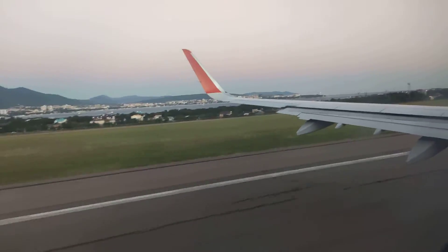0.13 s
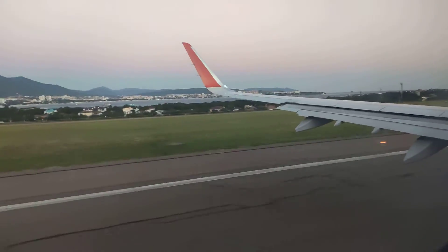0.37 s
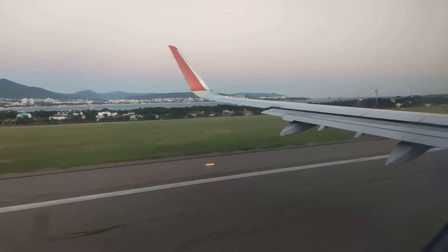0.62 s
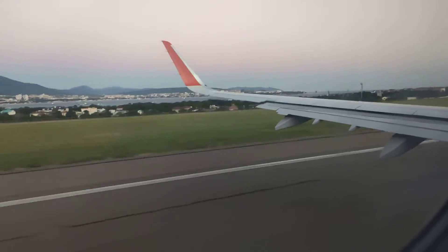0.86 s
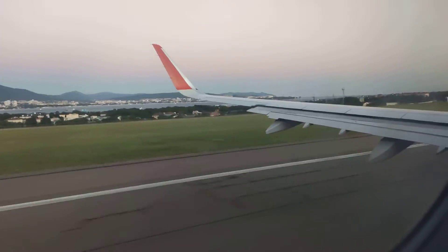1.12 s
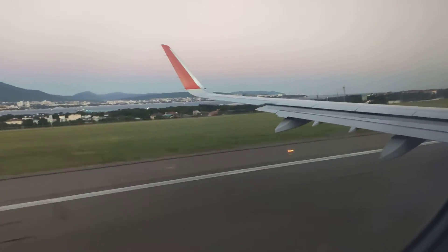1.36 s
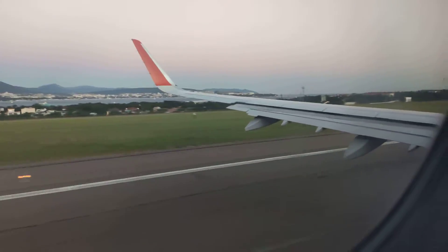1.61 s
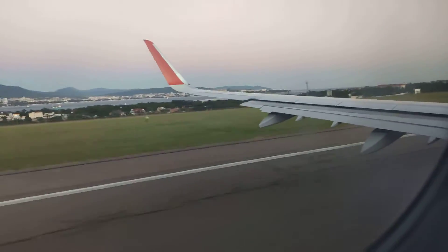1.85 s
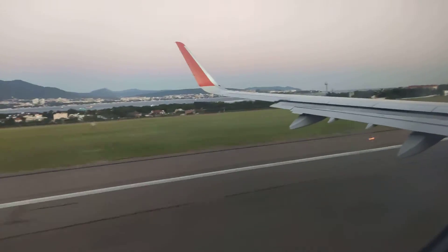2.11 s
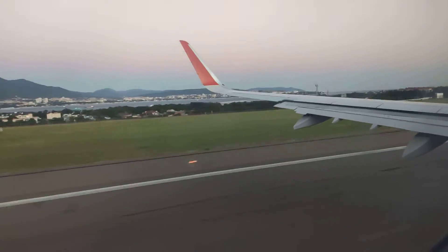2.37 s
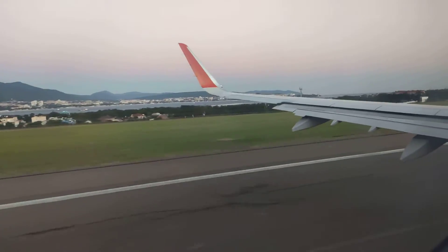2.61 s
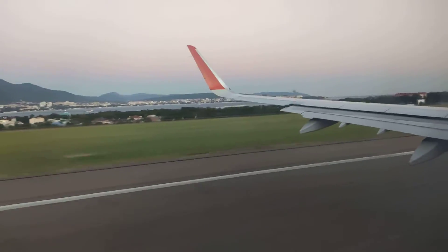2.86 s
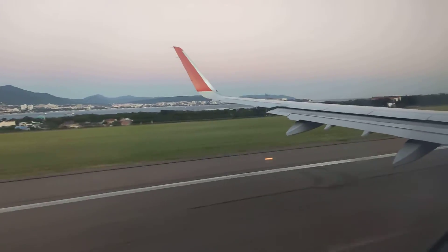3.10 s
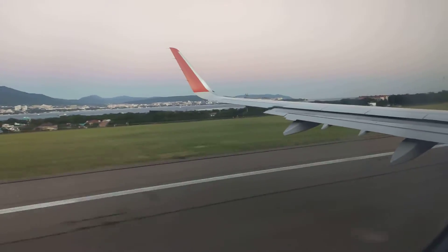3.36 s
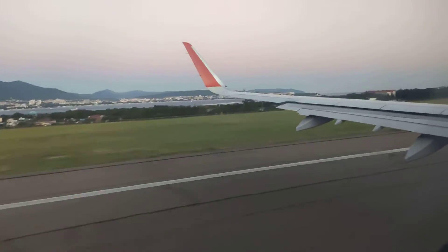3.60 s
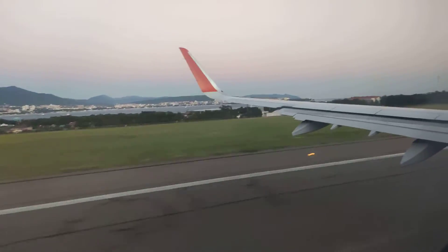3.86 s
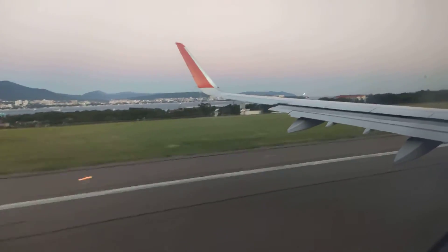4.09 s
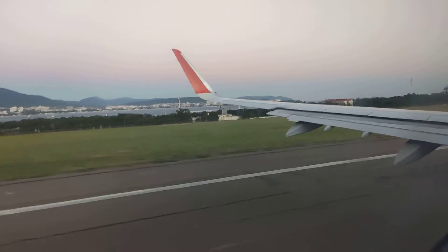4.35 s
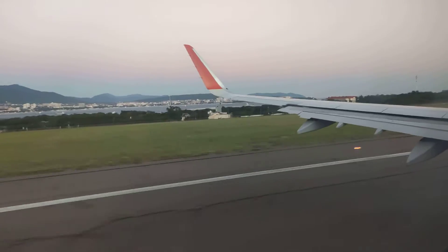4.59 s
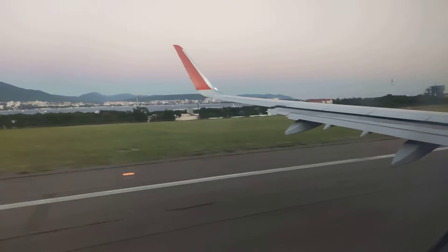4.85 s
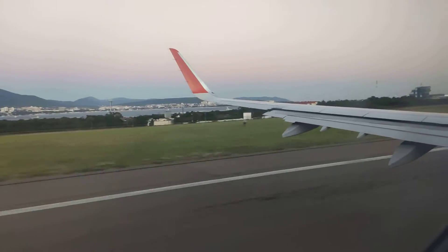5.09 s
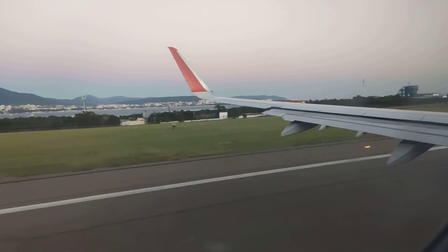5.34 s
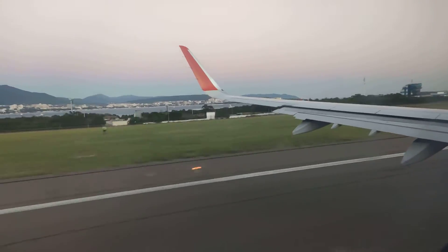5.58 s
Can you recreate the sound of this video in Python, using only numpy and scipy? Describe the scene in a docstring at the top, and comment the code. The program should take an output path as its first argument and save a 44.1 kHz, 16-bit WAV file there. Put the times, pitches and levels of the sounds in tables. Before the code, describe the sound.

For about 5.7 seconds we sit by the window of an airliner speeding down the runway. A loud, deep, boomy roar of engines and rolling dominates from the start, thickest in the low range around 150 to 300 Hz, swelling very slightly in the first half second and then holding steady. Beneath it the floor and landing gear drum with a soft, unsteady thud, a little weaker after 4 seconds. A faint airy hiss flutters on top. Runway bumps, several per second, make distant panels rattle in short grainy swells, notable near 1.5, 2.0 and 3.6 seconds and strongest at 3.9. Loose plastic trim gives small, dry, bright ticks, often left of centre: a pair at 2.0, one at 3.1, a sharp cluster at 3.9, and a busy run from 5.1 to the end. The lining answers very briefly. The small stereo microphone gives wide treble, nearly central bass and limited peaks.

```python
"""Jet and runway roar booms through the fuselage of an airliner on its take-off roll, heard in the cabin.
The roar is noise shaped by hull modes; a low thud is noise shaped by floor and gear modes.
Filtered noise hisses along skin and vents; loose plastic trim, mostly on the left, ticks in short bursts.
Panels farther off rattle in many small contacts that follow the runway bumps, and the lining answers.
A small stereo microphone with a peak limiter listens by the window."""
import sys
import numpy as np
from scipy import signal
from scipy.fft import rfft, irfft, next_fast_len
from scipy.io import wavfile
from scipy.ndimage import uniform_filter1d, minimum_filter1d, map_coordinates

SR = 44100
rng = np.random.default_rng(int(sys.argv[2]) if len(sys.argv) > 2 else 0)


def generate_wav(signal):
    """Clip the signal to [-1, 1] and save it as 16-bit WAV at the path in sys.argv[1]."""
    frames = np.transpose(np.atleast_2d(signal))
    scaled = np.clip(frames, -1, 1) * 32767
    pcm = np.round(scaled).astype(np.int16)
    wavfile.write(sys.argv[1], SR, pcm)


def gain_from_decibels(decibels):
    """Convert decibel values to linear amplitude factors."""
    exponent = np.asarray(decibels, float) / 20
    return 10 ** exponent


N = 251811


def unit_rms(x):
    """Scales to rms 1 over both channels together."""
    return x / np.sqrt(np.mean(x ** 2) + 1e-20)


def along(points, hz):
    """Reads (Hz, value) points along a log frequency axis."""
    point_hz, value = np.transpose(points)
    return np.interp(np.log(hz + 1), np.log(point_hz + 1), value)


def curves(rows):
    """Draws one value per sample for each column after the time."""
    s, *columns = np.transpose(rows)
    return [np.interp(np.arange(N) / SR, s, column) for column in columns]


def wobble(rate):
    """A smooth random curve with rate knots a second."""
    knots = rng.standard_normal(int(N * rate / SR) + 4)
    return map_coordinates(knots, [np.arange(N) * rate / SR])


def filtered(x, response):
    """Applies a response of frequency; mirrored ends keep the edges steady."""
    edge = 4096
    x = np.pad(x, [(0, 0), (edge, edge)], "reflect")
    size = next_fast_len(x.shape[1])
    spectrum = rfft(x, size) * response(np.fft.rfftfreq(size, 1 / SR))
    return irfft(spectrum, size)[:, edge:edge + N]


def modes(table, hz):
    """Gain of resonances driven by unrelated noise, so that their powers add."""
    power = 0
    for centre, width, db in table:
        detune = (hz * hz - centre * centre) / (hz * width + 1e-9)
        power = power + gain_from_decibels(db) ** 2 / (1 + detune ** 2) ** 2
    return np.sqrt(power)


# Likeness of the sound at the two microphone ports.
# Each row: frequency in Hz, left-right correlation from -1 to 1.
PORT_LIKENESS = [(40, .998), (90, .994), (190, .975), (330, .91), (600, .7), (900, .2), (1300, -.07),
                 (2500, 0), (8000, .05)]


def diffuse(gain):
    """Stereo noise of rms 1: long waves reach both ports alike, short ones do not."""
    def mid_side_gain(hz):
        angle = np.arccos(np.clip(along(PORT_LIKENESS, hz), -1, 1)) / 2
        return gain(hz) * np.array([np.cos(angle), np.sin(angle)])

    mid, side = filtered(rng.standard_normal((2, N)), mid_side_gain)
    return unit_rms(np.array([mid + side, mid - side]))


# Runway bumps that shake the cabin.
# Each row: time of the strongest shaking in seconds, jolt in dB over the calm ride.
RUNWAY_BUMPS = [(.09, 5.5), (.29, 1.5), (.52, 4.5), (.67, 4), (.82, 4.5), (1.02, 5), (1.24, 4.5), (1.53, 7),
                (1.74, 5), (1.88, 2.5), (2.03, 6), (2.21, 3.5), (2.45, 5), (2.76, 4), (2.98, 5), (3.12, 3),
                (3.32, 3), (3.58, 6), (3.92, 7.5), (4.11, 4), (4.23, 5), (4.87, 2.5), (5.04, 3),
                (5.18, 3.5), (5.34, 4), (5.44, 3), (5.66, 3)]


def shaking():
    """Each bump swells the shaking quickly and lets it settle; overlapping swells add in dB."""
    calm_db, rise_s, settle_s = -3, .04, .053
    s, jolt_db = np.transpose(RUNWAY_BUMPS)[:, :, None]
    step = 64  # samples between computed points
    t = np.arange(0, N + step, step) / SR - s
    swell = np.exp(-(t / np.where(t < 0, rise_s, settle_s)) ** 2)
    jolts_db = (jolt_db * swell).sum(axis=0)
    return calm_db + np.interp(np.arange(N) / step, np.arange(t.shape[1]), jolts_db)


# Colour of the air along skin and vents, cut off below 600 Hz.
# Each row: frequency in Hz, relative density in dB per Hz.
AIR_COLOUR = [(600, -22.5), (1000, -8), (1250, -3.5), (1500, -3.5), (2000, -3.5), (2750, -6), (3500, -11),
              (6000, -14), (7200, -18.5), (7700, -32), (9000, -35)]


def hiss():
    """Air rushes past skin and vents, slightly unsteady and a little louder over bumps."""
    flutter_db = .7 * wobble(rate=12) + .25 * shaking()
    return gain_from_decibels(-39 + flutter_db) * diffuse(lambda hz: gain_from_decibels(along(AIR_COLOUR, hz)) * (hz > 600))


# Colour of the rattle farther off in the cabin.
# Each row: frequency in Hz, relative density in dB per Hz.
PANEL_COLOUR = [(1000, -20.5), (2000, 1.5), (3500, 0), (6000, -1), (7000, -7), (8000, -15)]


def rattle():
    """Many small contacts all over the panels and bins, much harder when the floor shakes."""
    shake_db = shaking()
    when, hardness, place = rng.random((8000, 3)).T
    at = (when * (N - 1)).astype(int)
    size = gain_from_decibels(np.minimum(-3.5 * np.log(hardness), 10))  # many soft, few hard
    angle = place * np.pi / 2  # left to right at equal power
    hits = [np.bincount(at, size * np.cos(angle - side), N) for side in (0, np.pi / 2)]
    t = np.arange(SR // 100) / SR
    decay = np.exp(-t / .0016)
    envelope = signal.fftconvolve(hits, decay[None], axes=1)[:, :N]
    knocks = envelope * rng.standard_normal((2, N))
    panels = unit_rms(filtered(knocks, lambda hz: gain_from_decibels(along(PANEL_COLOUR, hz))))
    return gain_from_decibels(-46.5 + 1.64 * shake_db) * panels


def burst(t, rise, life):
    """A short contact: stereo noise with a quick rise and fall, both in seconds."""
    return (1 - np.exp(-t / rise)) * np.exp(-t / life) * rng.standard_normal((2, len(t)))


def faint_ticks(count):
    """Rows like those of the clear ticks, at random times, harder where the floor shakes."""
    level_db, scatter_db, growth = -37.5, 1.5, .89  # level at 0 dB of shaking; dB per dB of shaking
    pan_db, pan_scatter_db = 1.5, 3
    s = rng.random(count) * (N - 1) / SR
    chance = rng.standard_normal((count, 2))
    shake_db = shaking()[(s * SR).astype(int)]
    db = level_db + scatter_db * chance[:, 0] + growth * shake_db
    return list(zip(s + .012, db, pan_db + pan_scatter_db * chance[:, 1]))  # 12 ms after that shaking


# Clear ticks of the loose trim near the window.
# Each row: start in seconds, nominal peak level in dB before the microphone, left-right difference in dB.
CLEAR_TICKS = [(.0774, -28.5, 5.5), (.2777, -29.5, 2), (.387, -30.5, -1), (.525, -31.5, -1),
               (.815, -30.5, 3), (.8774, -27, 0.5), (1.0243, -28, -0.5), (1.4686, -31.5, 11.5),
               (1.5466, -32, 9), (1.735, -30, 1.5), (1.8148, -31.5, 3), (1.902, -28, 16.5),
               (1.9989, -25, 6), (2.0174, -29, 6), (2.1807, -34, 9), (2.4162, -28, 3.5), (2.4409, -32.5, 1),
               (2.5605, -29.5, 1), (2.98, -30, 3.5), (3.1154, -25, 7.5), (3.1623, -29, 11),
               (3.5718, -25, -2), (3.5903, -25, 5), (3.9005, -22.5, 2), (3.921, -33, 0.5), (3.937, -22, 5),
               (3.9679, -29, -4.5), (4.1116, -25.5, 3.5), (4.555, -34, 7), (5.1316, -27, 1),
               (5.1816, -24.5, 5), (5.2904, -27.5, 5), (5.3414, -24.5, 3), (5.4303, -24.5, 1.5),
               (5.4919, -29.5, 0.5), (5.5358, -28, -1.5), (5.6481, -27.5, 3)]
# Colour of the crack of the plastic.
# Each row: frequency in Hz, relative density in dB per Hz.
PLASTIC_COLOUR = [(1500, -22), (3500, -15), (4500, -1), (7000, -2), (8000, -8), (12000, -9)]


def ticks():
    """Each tick is a broad crack with a brief ring near the same pitch, mostly louder on the left."""
    ring_hz, scatter_hz = 5100, 500
    out = np.zeros((2, N + SR))
    t = np.arange(SR // 50) / SR
    f = np.fft.rfftfreq(len(t), 1 / SR)
    lead = 64  # samples of room ahead of the start
    for s, db, pan_db in list(CLEAR_TICKS) + faint_ticks(count=60):
        hz = ring_hz + scatter_hz * rng.standard_normal()
        colour = gain_from_decibels(along(PLASTIC_COLOUR, f)) + modes([(hz, 1500, -3)], f)
        contact = np.roll(burst(t, rise=.0004, life=.0011), lead, axis=1)
        tick = irfft(rfft(contact) * colour, len(t))
        # the energy of a 1 ms burst that peaks near 1
        tick *= 5.5 / np.linalg.norm(tick, axis=1, keepdims=True)
        level = gain_from_decibels([[db + pan_db / 2], [db - pan_db / 2]])
        out[:, round(s * SR) - lead:][:, :len(t)] += level * tick
    return out[:, :N]


def cabin(x):
    """Seats and lining answer briefly, differently at each port."""
    t60_s = .031
    t = np.arange(SR // 6) / SR
    tail = gain_from_decibels(-60 * t / t60_s) * rng.standard_normal((2, len(t))) * (t > .002)
    return signal.fftconvolve(x.mean(axis=0)[None], tail / np.linalg.norm(tail[0]), axes=1)[:, :N]


# Course of the take-off roll at the window seat, before the microphone.
# Each row: time in seconds, roar rms in dB, low thud rms in dB.
THRUST_COURSE = [(0, -12.5, -18.5), (.6, -11.5, -20), (1.5, -11.5, -18), (2.5, -11, -19.5),
                 (3.5, -11.5, -19), (4.3, -11.5, -21.5), (5.2, -11.5, -20.5), (5.71, -12.5, -21)]
# Fuselage and cabin modes that the roar excites.
# Each row: centre in Hz, width at -6 dB in Hz, relative gain in dB.
HULL_MODES = [(171.8, 31, -1.5), (212.7, 60.5, 0.5), (275.5, 72, -5), (492, 140, -15), (626, 87, -19.5),
              (1215, 140, -33)]
# Roar between the modes.
# Each row: frequency in Hz, relative density in dB per Hz.
JET_COLOUR = [(100, -37.5), (150, -9.5), (350, -11.5), (700, -25), (1000, -31.5), (1500, -49), (2500, -62)]
# Floor and gear modes that the wheels excite.
# Each row: centre in Hz, width at -6 dB in Hz, relative gain in dB.
FLOOR_MODES = [(26, 27, -12), (49.5, 20, -6), (72, 25, -7.5), (107.8, 40, -1)]


def roar():
    """Jet noise booms in the hull; the wheels drum the floor."""
    roar_db, thud_db = curves(THRUST_COURSE)
    boom = diffuse(lambda hz: np.hypot(modes(HULL_MODES, hz), gain_from_decibels(along(JET_COLOUR, hz))))
    thud = diffuse(lambda hz: modes(FLOOR_MODES, hz))
    return gain_from_decibels(roar_db) * boom + gain_from_decibels(thud_db) * thud


def scene():
    """Everything that reaches the two ports by the window."""
    trim = ticks() + rattle()
    return roar() + hiss() + trim + gain_from_decibels(-2) * cabin(trim)


def top_cut(x):
    """Nothing passes above the cut-off."""
    return signal.sosfilt(signal.butter(12, 15830, fs=SR, output="sos"), x)


# Treble loss of the small microphone.
# Each row: frequency in Hz, gain in dB.
MIC_TREBLE = [(8000, 0), (10000, -8), (12000, -13), (14000, -18.5), (15500, -22), (17000, -40)]
# Difference in colour between the two ports.
# Each row: frequency in Hz, left-right difference in dB.
PORT_LEAN = [(60, 0), (125, -.3), (200, -.6), (350, 0), (550, .3), (850, -3.3), (1330, -2.6), (2070, -1.1),
             (3220, -.3), (5020, 1.9), (7810, 2.6)]


def record(dry):
    """The ports differ in colour and lose treble; a limiter holds the peaks of the boom."""
    left_right = np.array([[1], [-1]])
    x = filtered(dry, lambda hz: gain_from_decibels(along(MIC_TREBLE, hz) + along(PORT_LEAN, hz) / 2 * left_right))
    ceiling = .91  # of full scale
    need = np.minimum(1, ceiling / (np.abs(x).max(axis=0) + 1e-9))
    gain = uniform_filter1d(minimum_filter1d(need, size=256), size=128)
    return top_cut(x * gain)


dry = scene()
out = record(dry)
generate_wav(out)
```